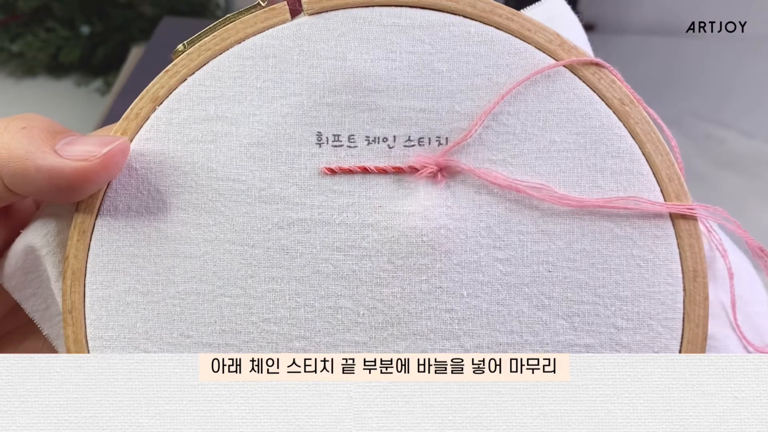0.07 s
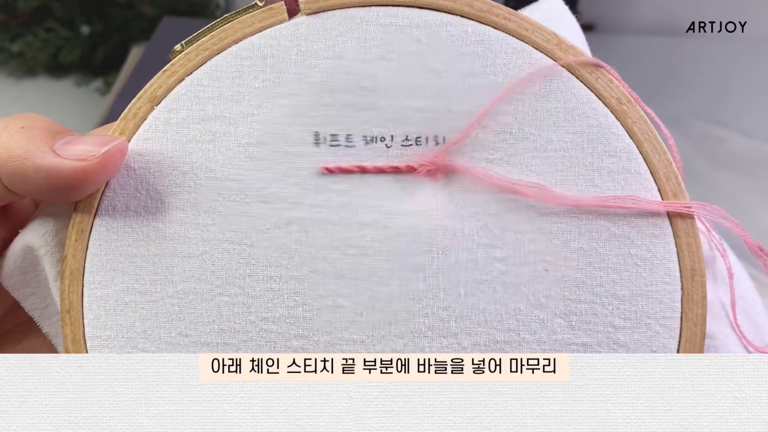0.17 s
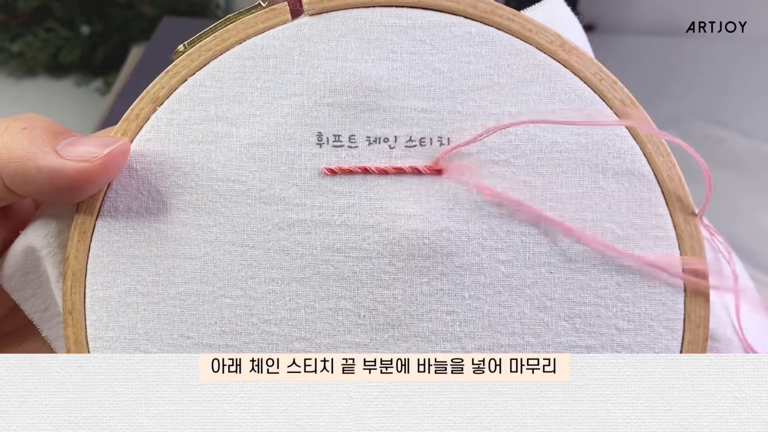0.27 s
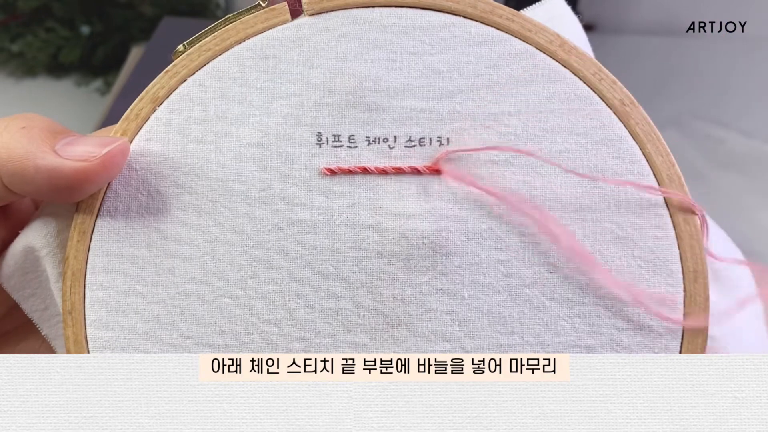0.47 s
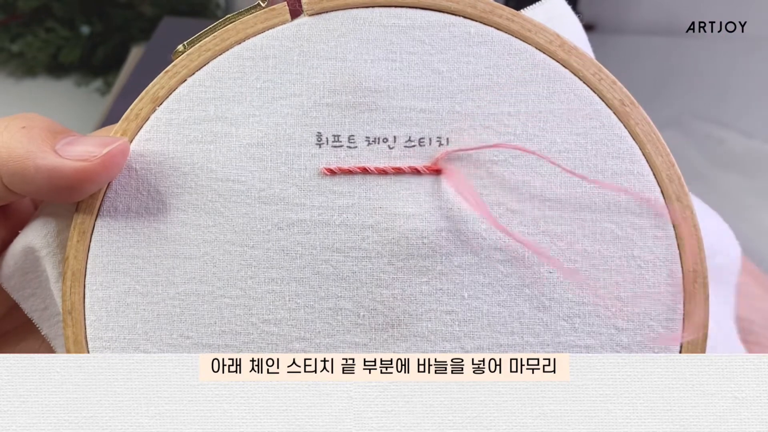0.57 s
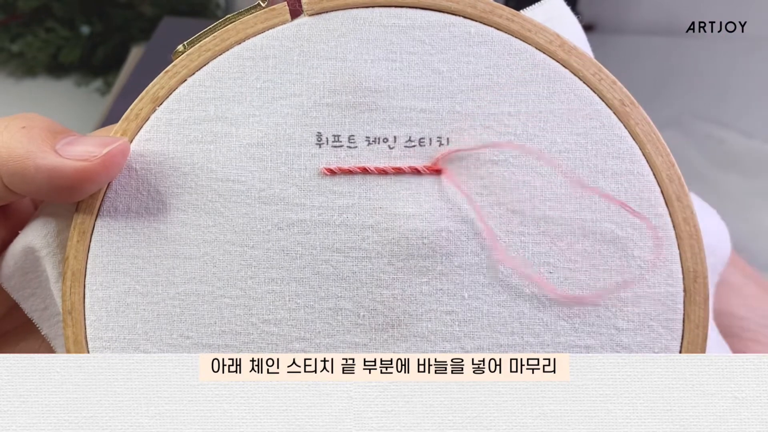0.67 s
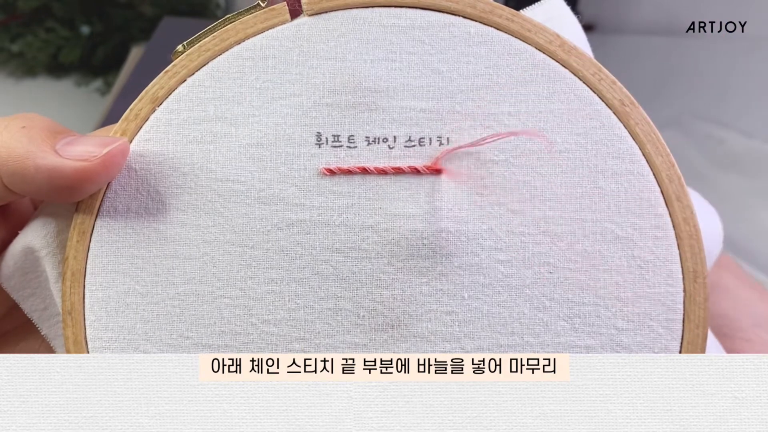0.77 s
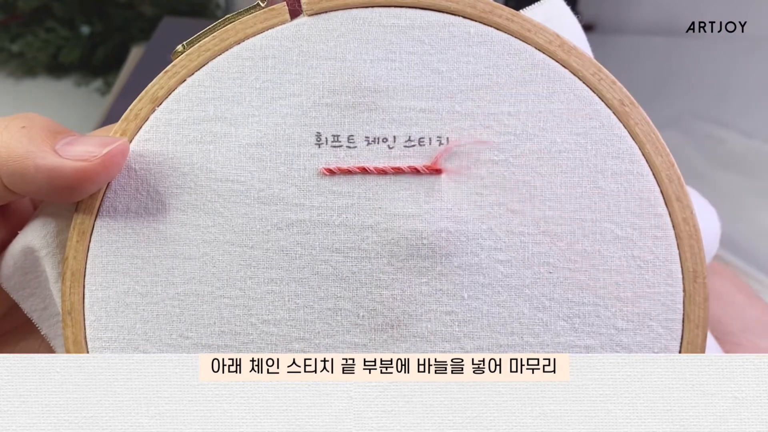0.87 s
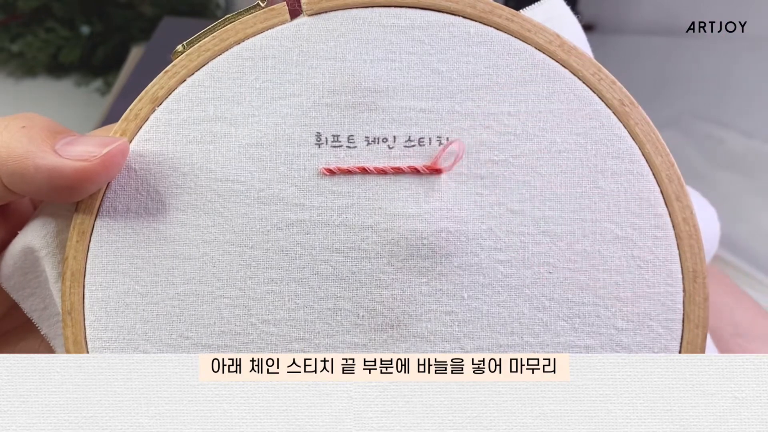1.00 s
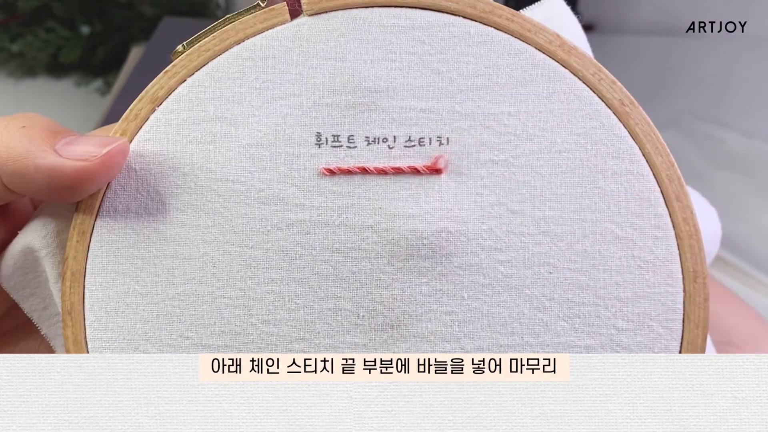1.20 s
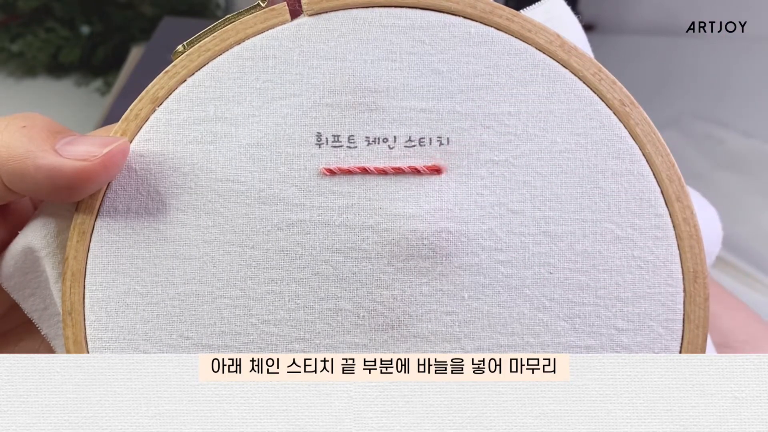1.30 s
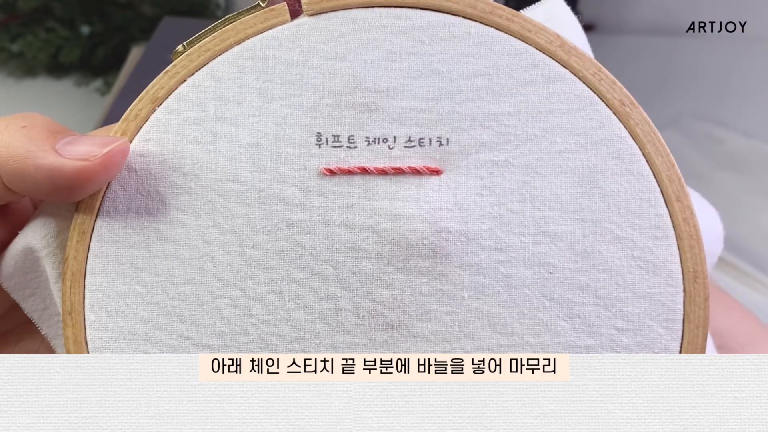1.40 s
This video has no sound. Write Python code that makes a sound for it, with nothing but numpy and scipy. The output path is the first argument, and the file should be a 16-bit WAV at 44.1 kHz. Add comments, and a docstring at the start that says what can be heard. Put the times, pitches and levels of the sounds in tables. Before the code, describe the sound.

Thread is pulled through taut cloth in an embroidery hoop. The needle pops through with a small drum-like thump, then the thread rasps and hisses, swelling and fading into a soft final tug, close up in a quiet room.

```python
"""In a quiet room, close up, embroidery thread is drawn through cotton stretched in a wooden hoop.
The thread rasps by stick-slip friction: tiny slips ring the modes of the cloth and hiss in the fibres.
Just ahead of it the needle's eye pops through, and the released cloth thumps like a small drum.
At the end the stitch is snugged softly and one fibre squeaks. The hands rumble faintly on the hoop."""
import sys
import numpy as np
from scipy import signal
from scipy.fft import rfft, irfft
from scipy.io import wavfile

SR = 44100
rng = np.random.default_rng(int(sys.argv[2]) if len(sys.argv) > 2 else 0)


def digitize_waveform(pressure):
    """Quantize a signal to 16-bit integers and store it at the path in sys.argv[1].

    Rows of a 2-D input are taken as channels; values are limited to [-1, 1].
    """
    field = np.atleast_2d(pressure).T
    bounded = np.clip(field, -1, 1)
    quanta = np.round(bounded * 32767).astype(np.int16)
    wavfile.write(sys.argv[1], SR, quanta)


N = 63945
T = np.arange(N) / SR

# friction of needle, then thread, on the weave: (time [s], force level [dB], hiss level [dB])
FRICTION = [(0, -59.5, -86), (.018, -60.5, -95), (.034, -48, -74.5), (.06, -59, -76.5), (.1, -76.5, -100),
            (.185, -85, -100), (.21, -67.5, -93), (.24, -43.5, -68.5), (.33, -55.5, -77.5),
            (.39, -53.5, -71.5), (.5, -46, -64), (.66, -42.5, -62), (.72, -44, -67), (.77, -44.5, -66.5),
            (.81, -50.5, -67.5), (.86, -50, -68), (.94, -53, -73.5), (1.02, -61.5, -93), (1.1, -61.5, -94),
            (1.145, -54.5, -83), (1.19, -56.5, -93.5), (1.28, -59, -89.5), (1.33, -68, -100),
            (1.45, -80.5, -105)]
# how sharply the fibres catch: (time [s], spectral slope [dB/octave])
SHARPNESS = [(0, 1.5), (.2, -1), (.4, 4), (.52, 0.5), (.67, -0.5), (.75, -2), (.81, -0.4), (.95, 0.7),
             (1.05, -3.5), (1.19, -3.5), (1.27, 0), (1.35, -6)]
SLOPE_PIVOT_HZ = 410

def rasp():
    """Friction-induced vibration: slips of needle and thread drive the cloth and its fibres."""
    force_db, hiss_db = in_time(FRICTION)
    slope_db, = in_time(SHARPNESS)
    grain = slips()
    hiss = fibre_hiss(grain * from_db(hiss_db))
    return hiss + cloth_resonance(grain, force_db, slope_db) + weave_resonance(force_db, slope_db)


def slips(slips_per_s=5000, spread_db=3, snag_db=1.36, snag_hz=54):
    """Stick-slip friction: random impulses of uneven size, stronger where fibres snag."""
    sizes = from_db(spread_db * np.minimum(rng.exponential(1, N), 4)) * rng.choice([-1, 1], N)
    released = rng.random(N) < slips_per_s / SR
    snags = from_db(snag_db * drift(snag_hz))
    return rms_one(sizes * released * snags)


# modes of cloth and hoop: (frequency [Hz], T60 [s], rubbed gain [dB], popped level [dB])
CLOTH_MODES = [(144, 0.17, -13, -34), (198, 0.18, -8, -29), (248.6, 0.15, -14, -34),
               (293.2, 0.17, -16, -40), (337.8, 0.11, -9.5, -32.5), (420.6, 0.066, -12, -33),
               (457.6, 0.15, -12, -37), (517.2, 0.14, -20.5, -33.5), (621, .08, -23.5, -45.5),
               (962.4, 0.065, -14.5, -31), (1020, 0.051, -18.5, -28.5), (1146, 0.097, -15.5, -37.5),
               (1390, .05, -26.5, -38), (1577, 0.068, -29.5, -42.5), (1721, 0.096, -23, -44.5),
               (1881, 0.087, -32, -49.5), (2136, 0.077, -31.5, -54.5), (2690, 0.044, -29, -67),
               (3263, .06, -34, -64)]
# drive of the lowest modes: (time [s], gain [dB])
BASS_DRIVE = [(0, 9), (.12, -6), (.2, -20), (.29, -1), (.37, -1.5), (.52, 5.5), (.62, -3), (.72, -2.5),
              (.78, -6), (.86, 0), (.93, 0), (1.02, -5), (1.15, 0), (1.26, -13.5), (1.36, -0.5)]
# drive of the middle modes: (time [s], gain [dB])
MIDDLE_DRIVE = [(0, -1.5), (.2, 1), (.4, 1), (.52, -0.5), (.62, -0.5), (.67, 1), (.72, -4), (.77, 5.5),
                (.82, 2), (.87, 0.5), (.93, -2), (1.1, -2), (1.22, 0), (1.36, 1.5)]

def cloth_resonance(grain, force_db, slope_db, bass_below_hz=270, middle_below_hz=560):
    """Modal superposition: each mode convolves the slips with its own impulse response."""
    bass_db, = in_time(BASS_DRIVE)
    middle_db, = in_time(MIDDLE_DRIVE)
    out = np.zeros(N)
    for k, (hz, t60, rubbed_db, _) in enumerate(CLOTH_MODES):
        if hz < bass_below_hz:
            tilt_db = bass_db
        elif hz < middle_below_hz:
            tilt_db = middle_db
        else:
            tilt_db = slope_db * np.log2(hz / SLOPE_PIVOT_HZ)
        force = grain * from_db(force_db + rubbed_db + tilt_db)
        mode = ring(T, hz, t60)
        out += (-1) ** k * signal.fftconvolve(force, mode / np.linalg.norm(mode))[:N]
    return out


# dense modes of the weave: (frequency [Hz], relative level [dB])
WEAVE_SPECTRUM = [(100, -3.5), (200, 6), (450, 1.5), (750, -9), (1050, -6.5), (1250, -8), (1850, -17.5),
                  (2300, -8.5), (2500, -13), (2750, -12.5), (3000, -30), (3260, -18.5), (3700, -29.5),
                  (8000, -47)]

def weave_resonance(force_db, slope_db, gain_db=-9.5):
    """Modal overlap: crowded modes merge into one spectrum, brighter as the fibres catch sharply."""
    weave = colour(slips() * from_db(force_db + gain_db), WEAVE_SPECTRUM)
    low = signal.sosfiltfilt(signal.butter(2, 2 * SLOPE_PIVOT_HZ, fs=SR, output="sos"), weave)
    return low + (weave - low) * from_db(2 * slope_db)


# hiss of the fibres: (frequency [Hz], relative level [dB])
HISS_SPECTRUM = [(1500, -14), (2700, -8), (3700, -5), (4600, -.5), (6600, 0), (9000, 1.5), (10200, -4),
                 (13500, -12), (14600, -11.5), (16000, -6)]

def fibre_hiss(drive, bounce_s=.000885, bounce_db=-10.5, wash_db=-9):
    """Comb filtering: the hiss interferes with its own early reflections."""
    wash = rms_one(rng.standard_normal(N) * dying(T - 2 * bounce_s, t60=.04))  # off hands and table
    response = from_db(wash_db) * wash / np.sqrt(N)
    response[0] += 1  # direct path
    response[int(bounce_s * SR)] += from_db(bounce_db)  # off the nearest surface
    return signal.fftconvolve(colour(drive, HISS_SPECTRUM), response / np.linalg.norm(response))[:N]


# snap of the weave: (delay [s], frequency [Hz], T60 [s], level [dB])
SNAP_MODES = [(0.00048, 431, 0.036, -20.5), (.0003, 1033, 0.029, -28.5), (0.00031, 2284, 0.015, -37.5),
              (.005, 1650, 0.02, -38)]
# bright tick at the onset: (frequency [Hz], relative level [dB])
CRACK_SPECTRUM = [(500, 8.5), (2500, 5), (3700, -30), (4600, 1), (11000, -6), (16000, -9)]
# scatter in hoop and room: (frequency [Hz], relative level [dB])
SCATTER_SPECTRUM = [(60, -1), (180, 1), (450, -4.5), (750, -9.5), (1000, -8), (1500, -20), (2400, -22.5),
                    (3200, -33), (4000, -39), (12000, -44)]
POP_S = .2163

def needle_pop(swell_cycles=2.76, crack_db=-44.5, scatter_db=-36.5, scatter_rise_s=.003):
    """Impulsive excitation: the eye clears the weave, and cloth and hoop ring in free decay."""
    age = T - POP_S
    snap = -sum(from_db(db) * ring(age - delay, hz, t60) for delay, hz, t60, db in SNAP_MODES)
    body = -sum(from_db(db) * ring(age, hz, t60) * np.clip(age * hz / swell_cycles, 0, 1)
                for hz, t60, _, db in CLOTH_MODES)
    crack = from_db(crack_db) * noise(CRACK_SPECTRUM) * dying(age, t60=.015)
    scatter = from_db(scatter_db) * noise(SCATTER_SPECTRUM) * dying(age, t60=.29)
    return snap + body + crack + scatter * np.clip(age / scatter_rise_s, 0, 1)


def cloth_thump(settled_hz=95.1, flat_hz=30, settle_s=.022, swell_s=.031):
    """Membrane vibration: the released cloth swings back in its lowest mode, starting flat in pitch."""
    age = np.maximum(T - POP_S, 0)
    hz = settled_hz - flat_hz * np.exp(-age / settle_s)
    phase = 2 * np.pi * np.cumsum(hz * (age > 0)) / SR
    swell = np.sin(np.pi / 2 * np.minimum(age / swell_s, 1)) ** 2
    after_peak = np.maximum(age - swell_s, 0)
    quick_drop = from_db(-32) * dying(after_peak, t60=.11)
    long_ring = from_db(-33) * dying(after_peak, t60=.33)
    return -swell * (quick_drop + long_ring) * np.sin(phase)


def fibre_squeak(peak_s=1.146, half_width_s=.0033, hz=2680, level_db=-65.5, wobble_rad=.7):
    """Nearly periodic stick-slip: one fibre sounds a brief tone as the stitch tightens."""
    phase = 2 * np.pi * hz * T + wobble_rad * drift(corner_hz=300)
    envelope = np.exp(-((T - peak_s) / half_width_s) ** 2)
    return from_db(level_db) * envelope * np.sin(phase)


# hands shifting on the hoop: (time [s], level [dB])
HAND_LEVEL = [(0, -56.5), (.075, -58.5), (.13, -78), (.2, -64.5), (.4, -60), (.6, -62.5), (.8, -60),
              (.9, -63), (1.02, -68), (1.12, -62), (1.24, -65.5), (1.3, -60), (1.37, -61.5), (1.45, -70.5)]
# their rumble: (frequency [Hz], relative level [dB])
HAND_SPECTRUM = [(20, -28), (42, -12.5), (60, 2), (90, 0), (130, -4.5), (300, -23.5), (1000, -64.5)]

def hand_rumble():
    """Structure-borne noise: the hands shake the hoop at low frequencies."""
    level_db, = in_time(HAND_LEVEL)
    return from_db(level_db) * noise(HAND_SPECTRUM)


# the still room: (frequency [Hz], relative level [dB])
ROOM_SPECTRUM = [(20, -4), (42, -5.5), (70, 6.5), (250, -1.5), (500, -8), (1000, -10), (2000, -27.5),
                 (4000, -30.5), (11000, -37), (14000, -49)]

def room_tone(level_db=-74.5):
    """Stationary noise: a faint, steady floor, strongest in the bass."""
    return from_db(level_db) * noise(ROOM_SPECTRUM)


def from_db(db):
    """Logarithmic level: decibels to amplitude ratio."""
    return 10 ** (np.asarray(db) / 20)


def rms_one(x):
    """Normalisation to unit rms."""
    return x / np.sqrt(np.mean(x ** 2) + 1e-20)


def in_time(rows):
    """Linear interpolation of each column at every sample."""
    times, *columns = np.transpose(rows)
    return [np.interp(T, times, column) for column in columns]


def colour(x, spectrum):
    """Spectral shaping that keeps the power of a white input."""
    hz, db = np.transpose(spectrum)
    bin_hz = np.maximum(np.arange(N + 1) * SR / (2 * N), 1)
    gain = rms_one(from_db(np.interp(np.log(bin_hz), np.log(hz), db)))
    return irfft(rfft(x, 2 * N) * gain)[:N]


def noise(spectrum):
    """Filtered Gaussian noise of about unit rms."""
    return colour(rng.standard_normal(N), spectrum)


def drift(corner_hz):
    """Random fluctuation: low-passed noise of unit rms."""
    pole = np.exp(-2 * np.pi * corner_hz / SR)
    return rms_one(signal.lfilter([1], [1, -2 * pole, pole * pole], rng.standard_normal(2 * N))[N:])


def dying(age, t60):
    """Exponential decay from age zero, silent before."""
    return (age >= 0) * np.exp(-np.log(1000) * np.maximum(age, 0) / t60)


def ring(age, hz, t60):
    """Impulse response of a damped oscillator."""
    return np.sin(2 * np.pi * hz * age) * dying(age, t60)


def scene():
    """Superposition: all sources add at one close microphone."""
    return (rasp() + needle_pop() + cloth_thump() + fibre_squeak() + hand_rumble() + room_tone())[None]


def record(dry, low_cut_hz=43, high_cut_hz=15800):
    """Band limiting: the microphone's low cut, and a steep cut at the top."""
    dry = signal.sosfilt(signal.butter(4, low_cut_hz, "high", fs=SR, output="sos"), dry)
    return signal.sosfilt(signal.ellip(10, .2, 70, high_cut_hz, fs=SR, output="sos"), dry)


dry = scene()
out = record(dry)
digitize_waveform(out)
```